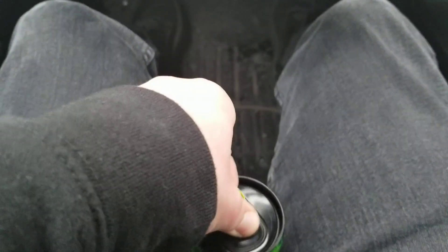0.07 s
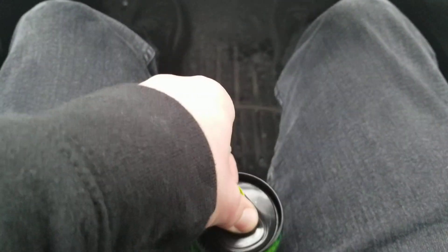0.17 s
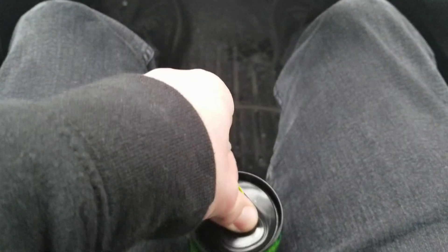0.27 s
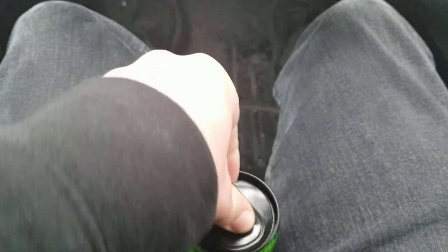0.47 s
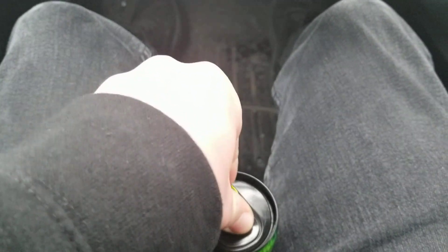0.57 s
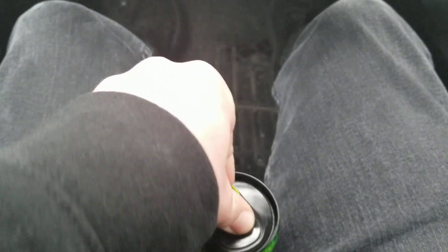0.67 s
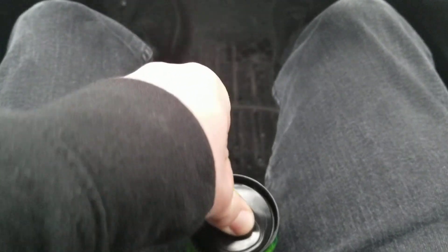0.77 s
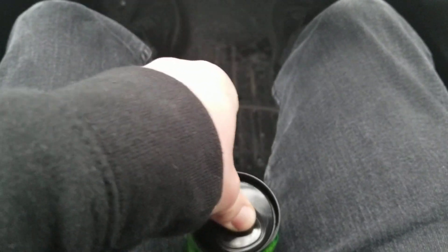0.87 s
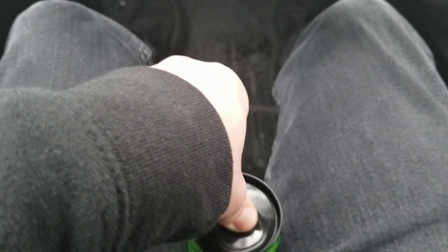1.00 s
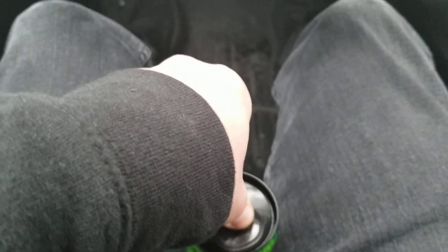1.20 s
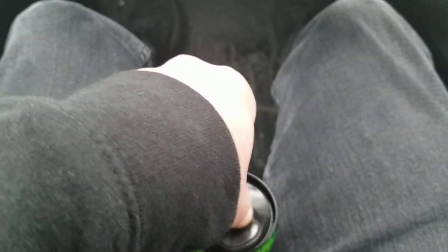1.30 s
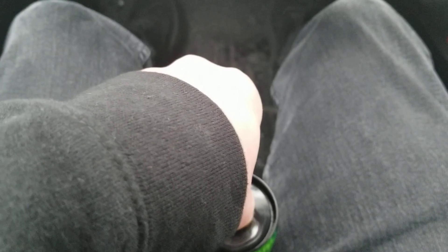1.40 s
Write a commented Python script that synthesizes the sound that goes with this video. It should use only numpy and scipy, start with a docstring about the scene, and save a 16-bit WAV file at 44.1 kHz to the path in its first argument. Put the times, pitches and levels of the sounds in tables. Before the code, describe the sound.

A metal can is opened up close, fizzes faintly, and its tab is flicked sharply.

```python
"""A drink can is opened on the lap, close up, in a small dead space with a low rumble and faint hiss.
At 0.05 s the seal cracks and gas spurts; the score line tears and the flap snaps in at 0.1 s.
The drink fizzes faintly under a few small ticks. At 1.13 s the tab is flicked: two sharp clicks,
then more ticks. Each snap of the metal rings the lid. From 1.27 s a thin whistle rises."""
import sys
import numpy as np
from scipy import signal
from scipy.fft import rfft, irfft
from scipy.io import wavfile

SR = 44100
rng = np.random.default_rng(int(sys.argv[2]) if len(sys.argv) > 2 else 0)


def unload_wav(signal):
    """Save mono or channel-first audio to the path in sys.argv[1] as 16-bit WAV at rate SR, clipped to [-1, 1]."""
    wavfile.write(
        sys.argv[1],
        SR,
        np.round(np.clip(np.atleast_2d(signal).T, -1, 1) * 32767).astype(np.int16),
    )


N = 63945
FFT_SIZE, TOP_HZ = 81920, 15850
T = np.arange(N) / SR
F = np.maximum(np.arange(FFT_SIZE // 2 + 1) * SR / FFT_SIZE, 1e-3)

# rumble (frequency [Hz], gain [dB])
RUMBLE_SPECTRUM = [(20, -22.5), (35, -9.5), (56, 2.5), (88, -5.5), (130, -1), (170, -13.5), (215, -13),
                   (290, -22.5), (400, -39.5), (700, -48)]
# rumble (time [s], gain [dB])
RUMBLE_ENVELOPE = [(0, 6.5), (.03, 4), (.15, -4.5), (.65, -3), (.8, -9.5), (.95, -1), (1.08, -3),
                   (1.45, -2.5)]
# coloured hiss (frequency [Hz], gain [dB])
HISS_SPECTRUM = [(500, -10), (1200, -15), (2100, -10), (2750, 6), (3800, -13), (7000, -5), (9500, -13.5),
                 (15500, -10)]
# fizz (frequency [Hz], gain [dB])
FIZZ_SPECTRUM = [(250, 3), (530, 2.5), (800, -9.5), (1700, -10.5), (3100, -7), (3500, -16.5), (4100, -8.5),
                 (4550, -18), (5200, -11), (9000, -23), (16000, -17.5)]
# fizz (time [s], level [dB])
FIZZ_ENVELOPE = [(0, -49), (.04, -53.5), (.15, -61.5), (.3, -69), (.55, -73.5), (.8, -85), (1.1, -83.5),
                 (1.25, -70.5), (1.45, -74.5)]
# whistle (time [s], pitch [Hz], level [dB])
WHISTLE_GLIDE = [(1.27, 5200, -86), (1.30, 5550, -77), (1.34, 6000, -84.5), (1.365, 6550, -79),
                 (1.395, 7045, -79), (1.425, 6940, -76.5), (1.45, 6850, -82)]
# low bumps (time [s], level [dB], frequency [Hz], decay [s])
LOW_BUMPS = [(0.053, -35.5, 61.5, .018), (1.128, -39, 65, 0.014)]
# stereo colour of the can (frequency [Hz], left minus right [dB])
CAN_BALANCE = [(200, -6.5), (800, 2), (1800, -8), (3000, -6), (4600, -14.5), (6200, 0.5), (7500, 11),
               (9500, -3), (12500, -14), (15000, 5)]
# modes of lid and can (frequency [Hz], gain [dB], T60 [s])
LID_MODES = [(763, 5, .048), (1815, 12.5, 0.063), (2060, 4.5, 0.035), (2554, 11.5, .036), (3070, 5, 0.052),
             (3270, 3, 0.034), (3547, 4, 0.018), (4100, 3, 0.04), (4484, 0, .06), (4660, 4.5, 0.026),
             (5960, 6.5, .06), (6270, 3, .055), (7120, 4, .05), (7490, 0.5, .05)]
# score line fractures (frequency [Hz], gain [dB])
TEAR_SPECTRUM = [(150, -18), (450, -4.5), (1100, -2), (1800, -4.5), (3200, -1.5), (6000, -14), (15000, -29)]
# gas jet (frequency [Hz], gain [dB])
JET_SPECTRUM = [(100, -19.5), (500, -22.5), (1100, -16.5), (2000, -6.5), (3500, -5), (4900, 3.5),
                (5800, -1), (7200, 0), (9200, -1.5), (12300, -0.5), (13800, 0.5), (15300, 1)]
# noisy crack of a snap (frequency [Hz], gain [dB])
CRACK_SPECTRUM = [(100, -25), (600, -20.5), (1400, -12), (2000, -10), (2700, 0), (5200, -3.5), (6900, 4),
                  (8300, -1.5), (9200, -7), (11000, -6.5), (12750, 3.5), (14000, -3.5), (15300, -0.5)]
# snaps of tab and lid (time [s], level [dB], pitch [Hz], width [Hz], crack [dB],
# knock pitch [Hz], knock [dB], ringing [dB], left minus right [dB])
METAL_SNAPS = [(0.0504, -3.5, 4897, 288, -32, 599, -30.5, 1, 3.5),
               (0.0526, -12.5, 4756, 304, -26, 908, -31, -8.5, -7.5),
               (0.0967, -5, 3415, 420.5, -39.5, 1800, -13.5, -3.5, 6.5),
               (0.4123, -34.5, 2350, 810, -11, 1297, -4.5, 1, -0.5),
               (0.4610, -54.5, 1320, 508, -32, 900, -27.5, -14, -2),
               (0.4768, -51.5, 2970, 1508, -16.5, 900.6, -36, 2, -4.5),
               (0.639, -65.5, 3740, 1200, -19, 911, -24, -6.5, -7.5),
               (0.6930, -58.5, 3700, 1208, -16.5, 904, -17, 6, -1.5),
               (1.1267, -20, 4524, 503, -25, 900, -29.5, -1.5, 21),
               (1.128, -6, 4598, 261.6, -18, 2946, -18.5, 3, 3.5),
               (1.1815, -3.5, 3520, 900, -21.5, 864, -13.5, -1.5, 0),
               (1.2443, -34.5, 4350, 1773, -31, 788, -6.5, 2, 3.5),
               (1.3126, -47.5, 4170, 1500, -19, 806, -5, 6, -1),
               (1.322, -53, 4940, 1793, -21, 780, -21, -12, -6),
               (1.3532, -54, 4536, 1700, -11, 780, -20, -11.5, -1.5)]


def amp(db):
    """Decibels to gain."""
    return 10 ** (np.asarray(db) / 20)


def unit_rms(x):
    """Scale to rms 1."""
    return x / np.sqrt(np.mean(x ** 2) + 1e-20)


def curve(rows, column=1):
    """Table column interpolated over time."""
    rows = np.array(rows)
    return np.interp(T, rows[:, 0], rows[:, column])


def spectrum_db(points):
    """Table interpolated over log frequency."""
    hz, db = np.array(points).T
    return np.interp(np.log(F), np.log(hz), db)


def min_phase(db):
    """Minimum-phase response with these gains."""
    cepstrum = irfft(np.log(amp(db)))
    cepstrum[1:FFT_SIZE // 2] *= 2
    cepstrum[FFT_SIZE // 2 + 1:] = 0
    return np.exp(rfft(cepstrum))


def filtered(x, response):
    """Apply a frequency response."""
    return irfft(rfft(x, FFT_SIZE) * response)[..., :N]


def resonance(hz, width_hz):
    """Band-pass response, gain 1 at centre."""
    return 1 / (1 + 1j * (F / hz - hz / F) * hz / width_hz)


def pan(db):
    """Stereo gains, left over right by db."""
    return amp(np.array([[db], [-db]]) / 2)


def noise(shared):
    """Stereo white noise with a share of its power in common."""
    white = rng.standard_normal((3, N))
    return np.sqrt(shared) * white[2] + np.sqrt(1 - shared) * white[:2]


def flutter(cutoff_hz):
    """Smooth random motion, rms 1."""
    return unit_rms(filtered(rng.standard_normal(N), np.exp(-(F / cutoff_hz) ** 2)))


def rumble(level_db=-55.5):
    """Low noise, slowly varying in level."""
    colour = amp(spectrum_db(RUMBLE_SPECTRUM)) / (1 + (F / 900) ** 4)
    low = unit_rms(filtered(noise(shared=.79), colour))
    return low * amp(level_db + curve(RUMBLE_ENVELOPE)) * pan(1.5)


def hiss(coloured_db=-80.5, white_db=-83.5):
    """Steady hiss, its coloured part to the left."""
    coloured = unit_rms(filtered(noise(shared=0), amp(spectrum_db(HISS_SPECTRUM))))
    return coloured * amp(coloured_db) * pan(15) + noise(shared=0) * amp(white_db)


def fizz(grain_db=2.03):
    """The drink fizzes: faint, grainy noise."""
    grains = noise(shared=.6) * amp(grain_db * flutter(900))
    colour = amp(spectrum_db(FIZZ_SPECTRUM)) * F / (F + 200)
    return unit_rms(filtered(grains, colour)) * amp(curve(FIZZ_ENVELOPE))


def room(direct, delay_s=.0004):
    """Add dense, short reflections from hand and near surfaces, and a weak tail."""
    out = direct
    for db, t60_s in ((-5.5, .058), (-44.5, .35)):
        echoes = noise(shared=1) * np.exp(-np.log(1000) * T / t60_s) * (T > delay_s)
        out = out + amp(db) * signal.fftconvolve(direct, unit_rms(echoes) / np.sqrt(N), axes=1)[:, :N]
    return out


def whistle(jitter_hz=110, flicker_db=2):
    """A faint, unsteady tone glides upward."""
    pitch_hz = curve(WHISTLE_GLIDE) + jitter_hz * flutter(450)
    level_db = curve(WHISTLE_GLIDE, column=2) + flicker_db * flutter(80)
    phase = 2 * np.pi * np.cumsum(pitch_hz) / SR
    return np.sqrt(2) * np.sin(phase) * amp(level_db) * (T > WHISTLE_GLIDE[0][0])


def bumps(rise_s=.006, thud_db=-5.5, thud_hz=260, thud_decay_s=.014):
    """A low bump and dull thud, mostly on the right, at the first crack and the tab click."""
    dull = unit_rms(filtered(noise(shared=1), F / (F + 50) / (1 + (F / thud_hz) ** 4)))
    out = 0
    for start_s, db, hz, decay_s in LOW_BUMPS:
        age_s = np.maximum(T - start_s, 0)
        envelope = 2 * (1 - np.exp(-age_s / rise_s)) * np.exp(-age_s / decay_s)
        bump = -np.sin(2 * np.pi * hz * age_s) * envelope
        thud = amp(thud_db) * dull * np.exp(-age_s / thud_decay_s) * (T > start_s)
        out = out + amp(db) * (bump + thud)
    return out * pan(-8.5)


def mic_ports(depth, right_lag_s=.00008):
    """Each microphone port hears the can with its own colour, the right one later."""
    db = depth * spectrum_db(CAN_BALANCE) / 2
    return np.array([min_phase(db), min_phase(-db) * np.exp(-2j * np.pi * F * right_lag_s)])


def lid(ring_db):
    """Lid response: direct path plus modes, summed in power."""
    mode_power = sum(np.abs(amp(db) * resonance(hz, np.log(1000) / np.pi / t60_s)) ** 2
                     for hz, db, t60_s in LID_MODES)
    return min_phase(10 * np.log10(1 + amp(ring_db) ** 2 * mode_power))


def tear(start_s=.083, end_s=.097, fractures_per_s=2300, level_db=-26.5):
    """Tiny fractures run along the score line and ring the lid."""
    fractures = (rng.random(N) < fractures_per_s / SR) * rng.standard_normal(N)
    colour = min_phase(spectrum_db(TEAR_SPECTRUM)) * lid(ring_db=-5.5)
    gain = amp(level_db) / np.std(filtered(fractures, colour))
    return gain * filtered(fractures * (T > start_s) * (T < end_s), colour * mic_ports(depth=.4))


def gas_jet(level_db=-17, rough_db=.8):
    """The jet swells as the slit opens, fades with the pressure and stops when the flap gives way."""
    open_s, rise_s = .048, .02
    fade_s, fade_decay_s = .083, .013
    stop_s, stop_decay_s = .096, .003
    swell = np.clip((T - open_s) / rise_s, 0, 1)
    fall = np.exp(-np.maximum(T - fade_s, 0) / fade_decay_s - np.maximum(T - stop_s, 0) / stop_decay_s)
    jet = unit_rms(filtered(noise(shared=.49), amp(spectrum_db(JET_SPECTRUM)) * (F < TOP_HZ)))
    gain = amp(level_db + rough_db * flutter(400))
    return filtered(jet * swell * fall * gain, mic_ports(depth=.46))


def snaps(crack_decay_s=.0012):
    """Each buckle of the metal rings the lid: a pitched snap with overtone, knock and noisy crack."""
    crack_colour = min_phase(spectrum_db(CRACK_SPECTRUM))
    bursts = rng.standard_normal((len(METAL_SNAPS), N)) * np.exp(-T / crack_decay_s)
    out = 0
    for row, burst in zip(METAL_SNAPS, bursts):
        start_s, db, hz, width_hz, crack_db, knock_hz, knock_db, ring_db, pan_db = row
        tone = resonance(hz, width_hz) * resonance(hz, .95 * hz)  # second band steepens the skirts
        knock = amp(knock_db) * resonance(knock_hz, width_hz=590) ** 2
        overtone = amp(-20) * resonance(1.2 * hz, width_hz=2700) ** 2
        power = np.sum(np.abs([tone, knock, overtone]) ** 2, axis=0)
        snap = min_phase(10 * np.log10(power + 1e-9))
        crack = amp(crack_db) * crack_colour * rfft(burst, FFT_SIZE) / np.linalg.norm(burst)
        body = lid(ring_db)
        gain = amp(db) / np.abs(irfft(snap * body)).max()
        delay = np.exp(-2j * np.pi * F * round(start_s * SR) / SR)
        out = out + gain * (snap + crack) * body * delay * pan(pan_db)
    return irfft(out * mic_ports(depth=1))[:, :N]


def scene():
    """The can in its room, over the background."""
    return room(snaps() + gas_jet() + tear()) + bumps() + whistle() + rumble() + fizz() + hiss()


def record(dry):
    """Clip at full scale, then low-pass."""
    lowpass = signal.ellip(10, .1, 80, TOP_HZ, fs=SR, output="sos")
    return signal.sosfilt(lowpass, np.clip(dry, -1, 1))


dry = scene()
out = record(dry)
unload_wav(out)
```